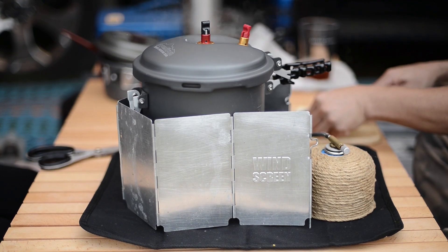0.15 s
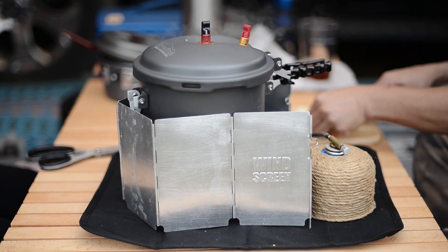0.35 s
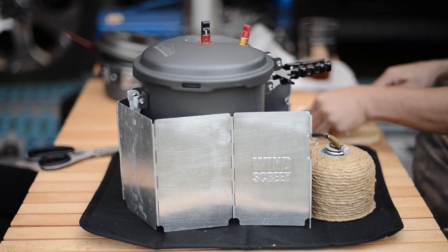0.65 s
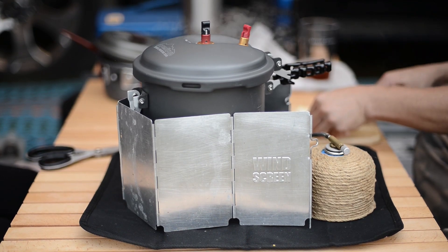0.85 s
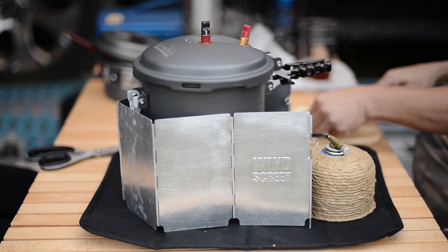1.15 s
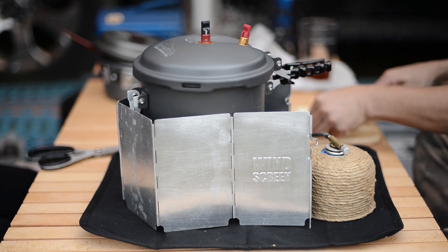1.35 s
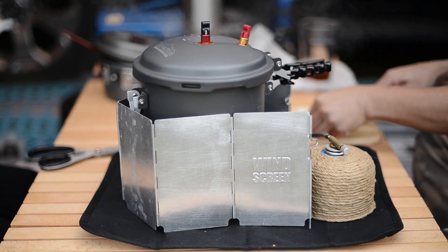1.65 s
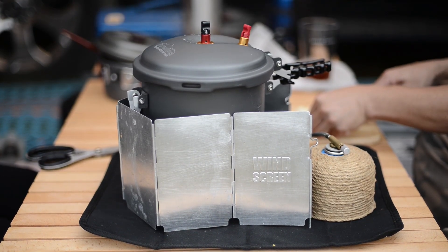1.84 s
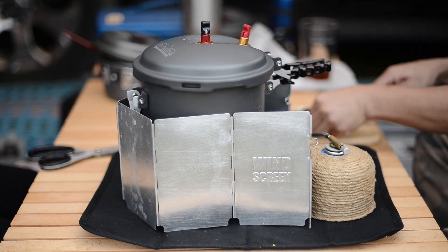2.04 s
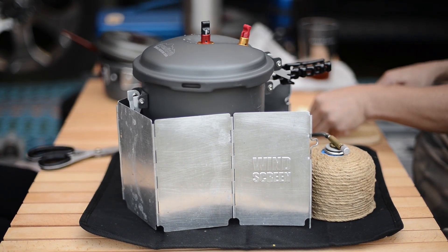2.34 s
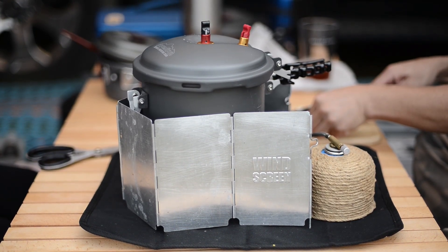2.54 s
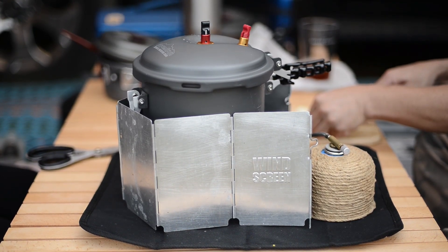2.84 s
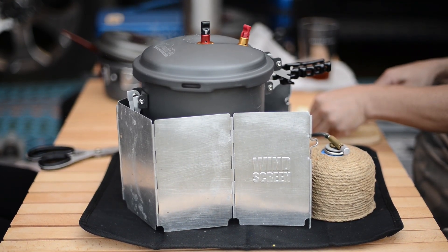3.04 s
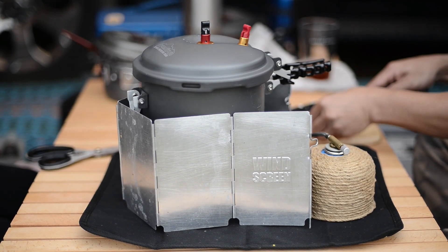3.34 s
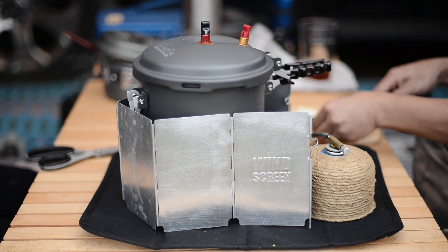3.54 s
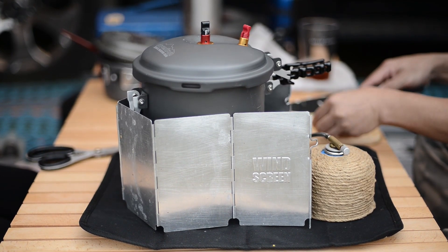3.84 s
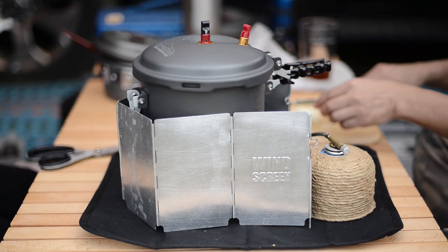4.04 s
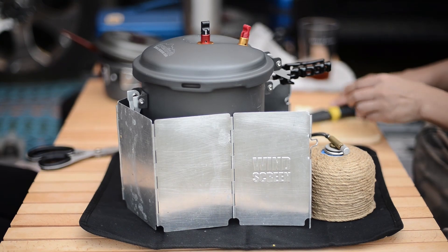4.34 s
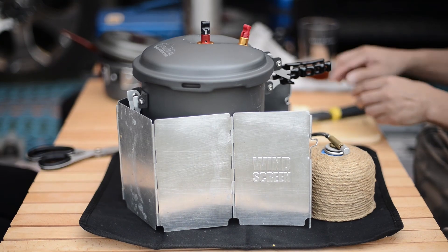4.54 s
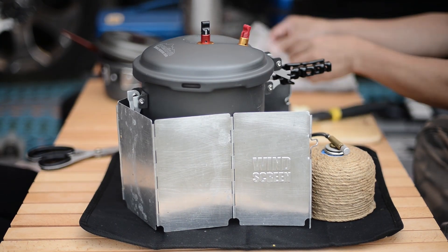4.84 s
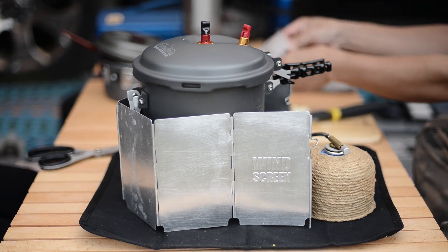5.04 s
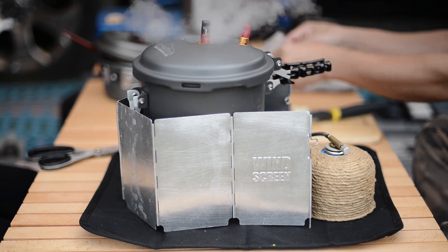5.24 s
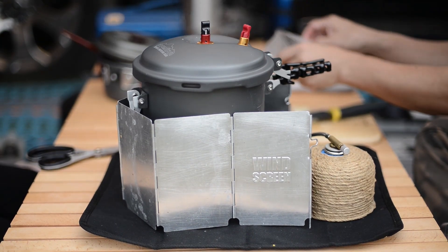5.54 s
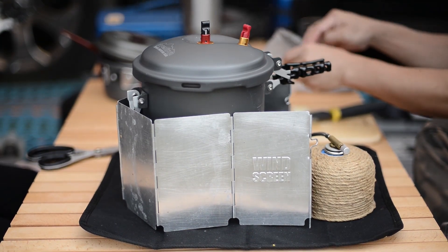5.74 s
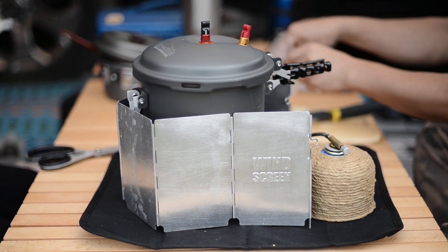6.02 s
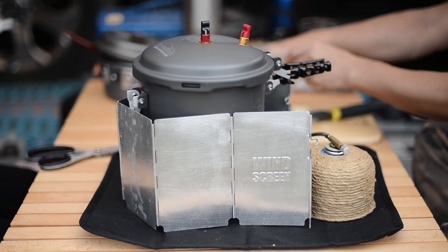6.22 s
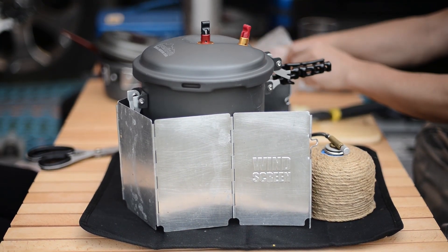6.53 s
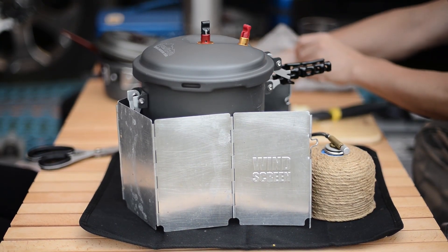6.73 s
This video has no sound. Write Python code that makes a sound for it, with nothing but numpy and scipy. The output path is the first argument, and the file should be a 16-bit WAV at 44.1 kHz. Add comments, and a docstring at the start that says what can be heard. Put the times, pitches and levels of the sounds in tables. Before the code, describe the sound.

Steady gas burner hiss outdoors, broken by two brief, louder bursts of pressure cooker steam, with light chopping and soft wind rumble.

```python
"""Pressure cooker on a camp stove.

A gas jet hisses and its flame roars under the pot.
Steam leaks at the valve, which lifts in two short spurts; between them a thin whistle creeps upward.
Behind the pot a knife chops on a board and is laid down, hands rub over the table and a paper towel,
and a light breeze bumps the microphones."""
import sys
import numpy as np
from scipy import signal
from scipy.fft import rfft, irfft
from scipy.io import wavfile
from scipy.ndimage import uniform_filter1d

SR = 44100
rng = np.random.default_rng(int(sys.argv[2]) if len(sys.argv) > 2 else 0)


def wav_record(signal):
    """Record a signal, one row per channel, as 16-bit PCM in the file named by sys.argv[1]."""
    frames = np.transpose(np.atleast_2d(signal))
    bounded = np.clip(frames, -1, 1)
    # unit amplitude maps onto the largest positive 16-bit level
    quanta = np.round(bounded * 32767).astype(np.int16)
    wavfile.write(sys.argv[1], SR, quanta)


N = 303408
FRAME, HOP = 2048, 512
BIN_HZ = np.fft.rfftfreq(FRAME, 1 / SR)
TIME_S = np.arange(N) / SR
FRAME_S = np.arange(N // HOP + 3) * HOP / SR


def amp(db):
    return 10 ** (np.asarray(db) / 20)


def unit_rms(x):
    return x / np.sqrt(np.mean(x ** 2) + 1e-20)


def over_hz(points):
    """Breakpoints interpolated over log frequency."""
    hz, value = np.transpose(points)
    return np.interp(np.log(BIN_HZ + 1), np.log(hz + 1), value)


def over_time(points, t=TIME_S):
    return np.interp(t, *np.transpose(points))


def resonance(hz, width_hz):
    """Magnitude of one resonance."""
    return 1 / np.sqrt(1 + (2 * (BIN_HZ - hz) / width_hz) ** 2)


def tilt(db_per_oct, pivot_hz, hz=BIN_HZ):
    return amp(db_per_oct * np.log2((hz + 100) / pivot_hz))


def drift(low_hz, high_hz, t=TIME_S):
    """Random wander, unit RMS."""
    rates_hz = np.geomspace(low_hz, high_hz, 24)
    waves = sum(np.sin(2 * np.pi * (hz * FRAME_S + rng.random())) / np.sqrt(hz) for hz in rates_hz)
    return np.interp(t, FRAME_S, unit_rms(waves))


def swell(peak_s, db, rise_s, fall_s):
    """Gaussian rise and fall."""
    return amp(db) * np.exp(-((TIME_S - peak_s) / np.where(TIME_S < peak_s, rise_s, fall_s)) ** 2)


def swells(rows):
    """Power sum of swells."""
    return np.sqrt(sum(swell(*row) ** 2 for row in rows))


# microphone pair: f/Hz, coherence
MIC_COHERENCE = [(100, .6), (500, .88), (1400, .94), (2300, .82), (4400, .82), (6000, .82), (8300, .89),
                 (11000, .89), (13300, .87), (16000, .6)]
# left phase lead: f/Hz, phase/rad
MIC_LEAD = [(0, 0), (600, -0.4), (2150, 0.4), (3100, 0.2), (4480, 1.3), (5000, 0.5), (6030, 2.1),
            (7490, 1.8), (8790, 2.8), (10100, 2.4), (11900, 3.2), (14200, 3.6), (14600, 4.2), (16400, 4.7)]
# left minus right: f/Hz, level/dB
MIC_BALANCE = [(400, 1), (1600, -1), (2300, 2), (3250, -2), (3700, 1.5), (4300, -4.5), (4720, 5),
               (5200, -0.5), (5900, -7), (6600, 5.5), (8100, -5), (9200, 5), (10400, -1.7), (15000, -0.5)]
def noise(magnitude, coherence=None):
    """Unit-RMS noise of a steady or moving spectrum, as the two microphones hear it."""
    a, b, c, d = rng.standard_normal((4, len(FRAME_S), len(BIN_HZ)))
    shared = np.clip(over_hz(MIC_COHERENCE) if coherence is None else coherence, -1, 1)
    left = a + 1j * b
    right = (shared * left + np.sqrt(1 - shared ** 2) * (c + 1j * d)) * np.exp(-1j * over_hz(MIC_LEAD))
    pan = amp(over_hz(MIC_BALANCE) / 2)
    spectra = np.array([left * pan, right / pan]) * magnitude
    _, stereo = signal.istft(spectra, nperseg=FRAME, noverlap=FRAME - HOP, time_axis=1, freq_axis=2)
    return unit_rms(stereo[:, :N])


# gas jet spectrum: f/Hz, relative density/dB
JET_SPECTRUM = [(150, -14.5), (500, -24), (1000, -16.5), (1700, -18.5), (2900, -13.5), (4000, -7),
                (5000, -5.5), (6200, -2.5), (7500, -3.5), (8300, -4), (9900, -6), (10600, -9.5),
                (12000, -7), (15700, -25.5)]
# jet strength: t/s, level/dB
JET_LEVEL = [(0, -37.5), (1.4, -38.5), (2.2, -40.5), (2.7, -39.5), (3.1, -41), (3.6, -39.5), (5.7, -39),
             (6.88, -38)]
# hollow under the pot: f/Hz, width/Hz, relative level/dB
FLAME_MODES = [(357, 128, -3), (415.5, 18.4, -0.5), (472, 40, 0.5), (547, 48, -6), (756, 280, -7)]
def burner(colour, flutter_db=0.59, roar_db=-55, waver_db=1.0):
    """The jet hisses and the flame roars in the hollow under the pot."""
    jet = noise(amp(over_hz(JET_SPECTRUM)) * colour)
    jet *= amp(over_time(JET_LEVEL) + flutter_db * drift(2, 30))
    roar = noise(sum(amp(db) * resonance(hz, width_hz) ** 2 for hz, width_hz, db in FLAME_MODES))
    return jet + roar * amp(roar_db + waver_db * drift(0.884, 11))


# narrow resonances and broad treble colouring of the hiss: f/Hz, width/Hz, gain/dB
HISS_COLOUR = [(2220, 79, 1), (4470, 110, -7.5), (4780, 29, -1.5), (5470, 26, 4), (5700, 50, 5),
               (6160, 19, 8), (6620, 35, -9), (7060, 25, 5), (6840, 24, 8.5), (7414, 65, 4), (7680, 30, -2),
               (8230, 340, 2), (9500, 25, 2), (10100, 400, -1), (10260, 320, 0), (12650, 1000, -7),
               (14800, 1400, 6.5)]
def hiss_colour(ripple_db=1.59):
    """Peaks, dips and fine ripple shared by the gas and steam hiss."""
    ripple = unit_rms(uniform_filter1d(rng.standard_normal(len(BIN_HZ)), size=3))
    bands_db = sum(db * resonance(hz, width_hz) ** 2 for hz, width_hz, db in HISS_COLOUR)
    return amp(ripple_db * ripple + bands_db)


# escaping steam: f/Hz, relative density/dB
STEAM_SPECTRUM = [(200, -58), (600, -21.5), (1300, -11.5), (2300, -9.5), (3000, -8), (4300, -3), (6200, -1),
                  (7400, -1.5), (8300, -1), (10000, -2.5), (11000, -5), (12200, -3.5), (14000, -16.5),
                  (15700, -24)]
# flow past the seated valve: t/s, level/dB
LEAK_LEVEL = [(0, -41), (.25, -39.5), (.53, -33.8), (.72, -38.5), (.95, -37), (1.15, -42), (1.4, -40),
              (1.7, -55), (1.9, -75)]
def valve_leak(colour, ref_hz=2410, ref_db=-40, oct_per_db=0.06, width_hz=550, sputter_db=-0.1):
    """Steam seeps past the valve; the gap resonates higher with more flow and passes little below."""
    flow_db = over_time(LEAK_LEVEL, FRAME_S)[:, None]
    gap_hz = ref_hz * 2 ** (oct_per_db * (flow_db - ref_db))
    highpass = BIN_HZ ** 2 / (BIN_HZ ** 2 + (gap_hz / 2) ** 2)
    gap = (1 + 1.35 * resonance(gap_hz, width_hz) ** 2) * highpass
    spectrum = amp(over_hz(STEAM_SPECTRUM)) * tilt(0.7, 6000) * colour
    return noise(spectrum * gap) * amp(over_time(LEAK_LEVEL) + sputter_db * drift(3.1, 30.5))


# lifts: open/s, spit/s, shut/s, rise/s, level/dB, spit level/dB, open and shut tilt/(dB/oct)
VALVE_LIFTS = [(1.412, 1.475, 1.557, .014, -24, -39, -0.45, 0.34),
               (5.24, 5.289, 5.351, 0.012, -22.5, -34, -0.33, 1.6)]
# spat water: f/Hz, relative density/dB
SPIT_SPECTRUM = [(150, -11), (400, -5), (900, -3.5), (1500, 3), (3000, -2), (6000, -27)]
def valve_spurts(colour, echo_db=-7, echo_t60_s=0.19, spit_width_s=0.018, fizz_db=4):
    """The valve pops open, spits water, brightens as it narrows and snaps shut with a short echo."""
    out = np.zeros((2, N))
    # the fast jet fizzes more than the leak
    spectrum = amp(over_hz(STEAM_SPECTRUM) + fizz_db * resonance(13500, 4000) ** 2) * colour
    for open_s, spit_s, shut_s, rise_s, db, spit_db, open_tilt, shut_tilt in VALVE_LIFTS:
        echo = amp(echo_db - 60 * np.maximum(TIME_S - shut_s, 0) / echo_t60_s)
        envelope = np.clip((TIME_S - open_s) / rise_s, 0, 1) * np.where(TIME_S < shut_s, 1, echo)
        closing_rad = np.clip((TIME_S - open_s) / (shut_s - open_s), 0, 1) * np.pi / 2
        wide = noise(spectrum * tilt(open_tilt, 6000))
        narrow = noise(spectrum * tilt(shut_tilt, 6000))
        out += amp(db) * envelope * (np.cos(closing_rad) * wide + np.sin(closing_rad) * narrow)
        spit = noise(amp(over_hz(SPIT_SPECTRUM)) * colour)
        out += spit * swell(spit_s, spit_db, spit_width_s, spit_width_s)
    return out


# whistle glide: t/s, f/Hz
WHISTLE_PITCH = [(3.5, 4850), (3.95, 5630), (4.4, 5500), (4.87, 5880), (5.15, 5498)]
def steam_whistle(colour, start_s=2.83, attack_s=1.1, end_s=5.25, release_s=0.12,
                  level_db=-47, waver_db=1.5, width_hz=650, wander_hz=80):
    """A narrow band of steam noise glides up as pressure builds and dies at the second lift."""
    hz = over_time(WHISTLE_PITCH, FRAME_S) + wander_hz * drift(2, 15, FRAME_S)
    flow = np.interp(TIME_S, [start_s, start_s + attack_s, end_s - release_s, end_s], [0, 1, 1, 0])
    band = noise(colour * resonance(hz[:, None], width_hz) ** 2)
    return band * flow * amp(level_db + waver_db * drift(2, 10))


# chops: t/s, gain/dB, tilt/(dB/oct)
CHOP_HITS = [(.2882, -29, -3), (.8185, -28, -2.5), (1.2564, -25.5, -1.5), (1.7497, -25.5, -0.5),
             (2.2907, -29, -2), (2.9086, -29, -2), (3.5825, -48.5, -5.5)]
# chopping board: f/Hz, relative level/dB, t60/s
BOARD_MODES = [(391, -13, 0.031), (524, -9.5, 0.044), (846, -5.5, 0.031), (974, 1.5, 0.051),
               (1013, -2.5, 0.032), (1263, -0.5, 0.066), (1357, 2.5, 0.042), (1460, -8, 0.069),
               (1860, -5.5, 0.047), (1870, -10, 0.054), (2133, -16, 0.088), (2350, -9, 0.032),
               (2710, -22, .05), (2860, -12, 0.04), (3510, -18, 0.12), (4230, -11.5, 0.13)]
def knife_chops():
    """The blade strikes and rings the board."""
    return knocks(CHOP_HITS, BOARD_MODES, spread_rad=0.72, crack_db=-5.5, crack_t60_s=0.078, hold_s=0.0059)


# landing and settling: t/s, gain/dB, tilt/(dB/oct)
LANDING_HITS = [(4.5007, -26.5, -1.5), (4.562, -48, -7.5)]
# blade and handle: f/Hz, relative level/dB, t60/s
KNIFE_MODES = [(520, -11, 0.13), (854, -3.5, 0.09), (1090, -10, 0.067), (1331, 0.5, 0.089),
               (1610, 0.5, 0.043), (2090, -2, 0.043), (2175, -0.5, 0.046), (2700, -11, .06),
               (3180, -18, 0.071), (4180, -3, 0.073), (4710, -0.5, 0.063)]
def knife_laid_down():
    """The knife lands, rings and settles."""
    return knocks(LANDING_HITS, KNIFE_MODES,
                  spread_rad=0.5, crack_db=-3, crack_t60_s=0.11, hold_s=0.0067)


# dull crack of blade on wood: f/Hz, relative density/dB
CRACK_SPECTRUM = [(120, -34), (250, -7), (680, -9.5), (1100, -4), (1600, -3), (2200, -3), (3200, -6),
                  (4300, -3.5), (5800, -29), (9000, -36)]
def knocks(hits, modes, spread_rad, crack_db, crack_t60_s, hold_s):
    """Blows on one spot: modes ring, and a crack holds while the blade bears down, then decays."""
    n = SR // 5
    t = np.arange(n) / SR
    blow_hz = np.fft.rfftfreq(n, 1 / SR)
    phases = rng.random(len(modes))
    sides = np.sign(rng.standard_normal(len(modes)))
    ring = np.zeros((2, n))
    for (hz, db, t60_s), phase, side in zip(modes, phases, sides):
        # each mode takes its own way round the pot
        lag_rad = np.array([[0], [2 * np.pi * hz / SR + spread_rad * side]])
        ring += amp(db - 60 * t / t60_s) * np.sin(2 * np.pi * (hz * t + phase) - lag_rad)
    attack = np.interp(t, [0, .0003, .005], [0, .5, 1])
    decay = amp(crack_db - 60 * np.maximum(t - hold_s, 0) / crack_t60_s)
    wood = noise(amp(over_hz(CRACK_SPECTRUM)), coherence=0.79)
    out = np.zeros((2, N))
    for hit_s, db, db_per_oct in hits:
        start = round(hit_s * SR)
        crack = .85 * wood[:, :n] + .5 * wood[:, start:start + n]  # the spot's share + this blow's
        spectrum = rfft(attack * (ring + decay * crack)) * tilt(db_per_oct, 1870, blow_hz)
        blow = irfft(spectrum, n)[:, :n * 3 // 4]
        out[:, start:start + blow.shape[1]] += amp(db) * blow
    return out


# strokes: t/s, level/dB, rise and fall/s, f/Hz
RUB_STROKES = [(4.72, -55.5, 0.065, 780), (4.931, -57.5, 0.082, 740), (5.44, -48, 0.099, 2650),
               (5.68, -58, 0.18, 2040), (6.33, -53, 0.11, 1720), (6.7, -60.5, .3, 2200)]
def handling(width_oct=0.82, grain_db=2.0):
    """Hands slide things over the table and fold a paper towel: grainy rubs, the paper higher."""
    out = np.zeros((2, N))
    for peak_s, db, width_s, hz in RUB_STROKES:
        band = np.exp(-.5 * (np.log2((BIN_HZ + 1) / hz) / width_oct) ** 2)
        out += noise(band) * swell(peak_s, db, width_s, width_s)
    return out * amp(grain_db * drift(8, 40))


# spells of singing: t/s, relative level/dB, rise/s, fall/s
FLAME_SPELLS = [(.9, -60.5, 0.96, 2.7), (4.2, -55, .35, 0.49), (5.15, -57, 0.27, .35)]
def flame_note(hz=475, wander_hz=4.6, waver_db=2.0, pan_db=5.0):
    """The flame sings one thin, unsteady note."""
    cycles = np.cumsum(hz + wander_hz * drift(2.7, 30)) / SR
    note = np.sin(2 * np.pi * cycles) * swells(FLAME_SPELLS) * amp(waver_db * drift(2.1, 25))
    return note * amp([[pan_db], [-pan_db]])


# turbulence: f/Hz, relative density/dB
WIND_SPECTRUM = [(15, -20), (45, 1), (80, -2), (130, -6), (200, -12), (350, -25.5), (700, -29.5),
                 (2000, -51)]
# gusts: t/s, relative level/dB, rise/s, fall/s
WIND_GUSTS = [(1.87, -42, 0.13, 0.21), (2.35, -47, 0.11, 0.3), (2.7, -46.5, 0.11, 0.11),
              (2.93, -36.5, 0.17, 0.12), (3.16, -44.5, 0.046, 0.11), (3.95, -39, 0.16, 0.05),
              (4.55, -52, 0.8, 0.23), (5.1, -44, 0.051, 0.11), (5.6, -43.5, 0.071, .3),
              (6.4, -45.5, 0.66, .7)]
# air between gusts: t/s, relative level/dB
WIND_FLOOR = [(0, -64), (.6, -56.5), (6.88, -61)]
def breeze(gain_db=2, lump_db=2.3):
    """Lumpy low turbulence in gusts, only loosely related at the two microphones."""
    strength = np.hypot(amp(over_time(WIND_FLOOR)), swells(WIND_GUSTS))
    rumble = noise(amp(over_hz(WIND_SPECTRUM)), coherence=-0.42)
    return rumble * strength * amp(gain_db + lump_db * drift(5, 30))


def scene():
    colour = hiss_colour()
    stove = burner(colour) + flame_note()
    steam = valve_leak(colour) + steam_whistle(colour) + valve_spurts(colour)
    return stove + steam + knife_chops() + knife_laid_down() + handling() + breeze()


def record(dry):
    """Low-pass at 16 kHz."""
    taps = signal.firwin(511, 16000, window=("kaiser", 9), fs=SR)
    return signal.oaconvolve(dry, taps[None], "same")


dry = scene()
out = record(dry)
wav_record(out)
```